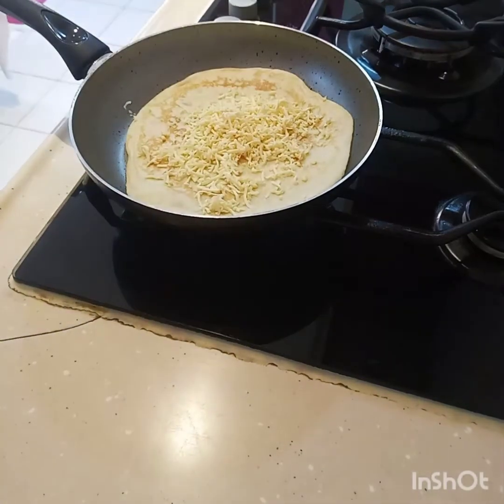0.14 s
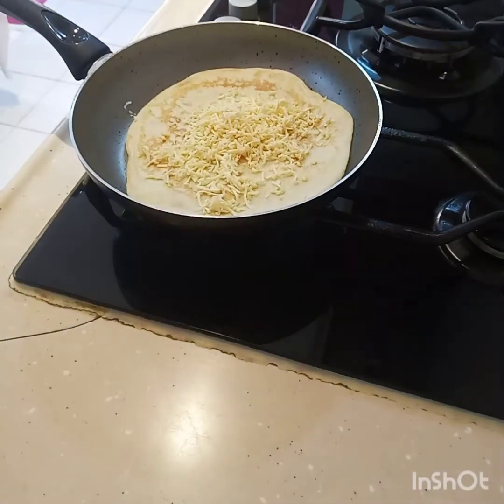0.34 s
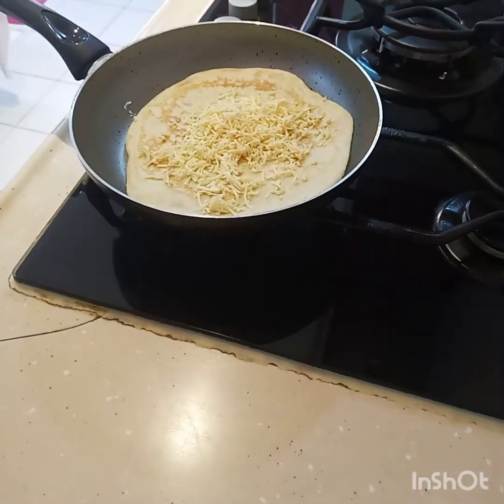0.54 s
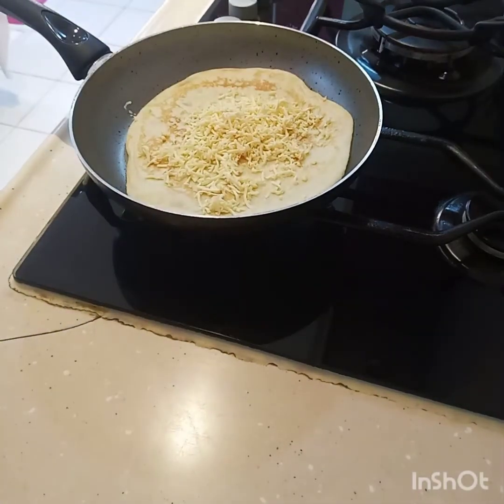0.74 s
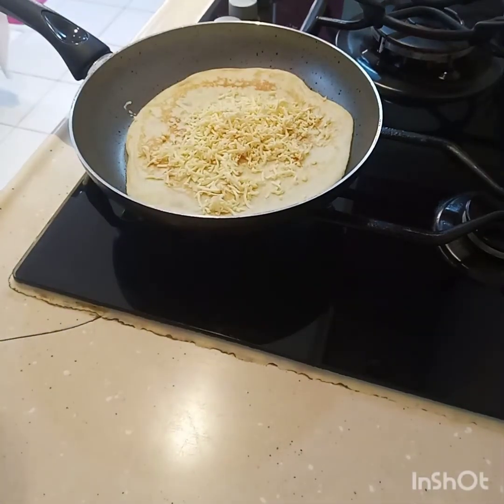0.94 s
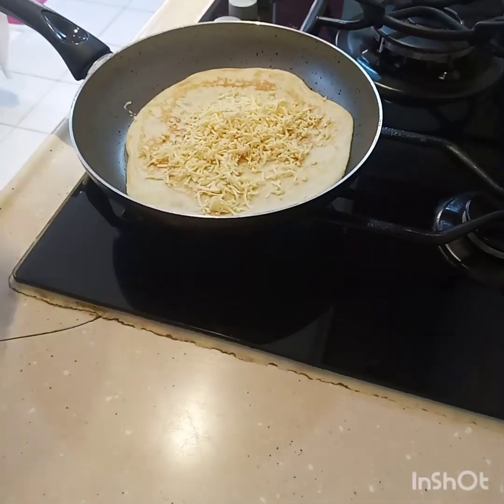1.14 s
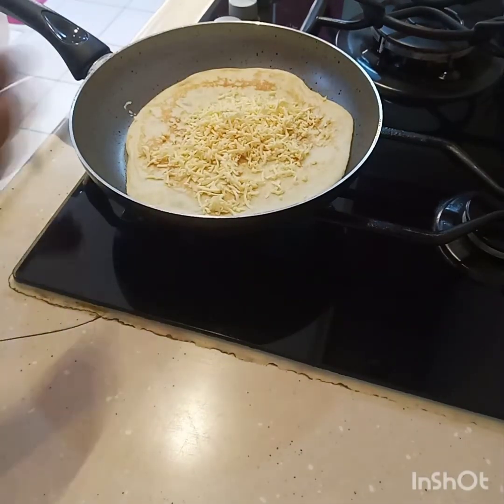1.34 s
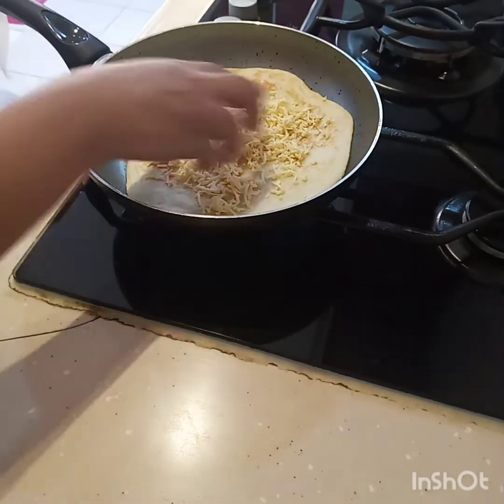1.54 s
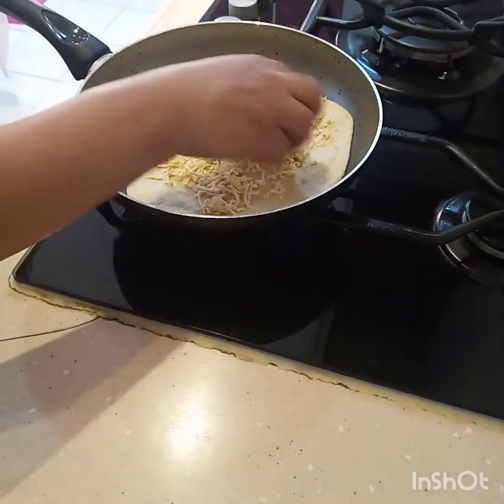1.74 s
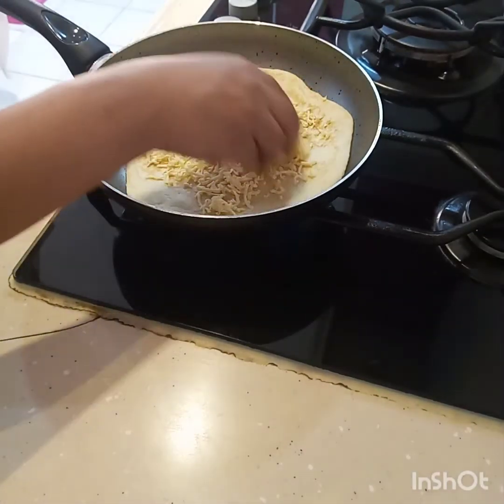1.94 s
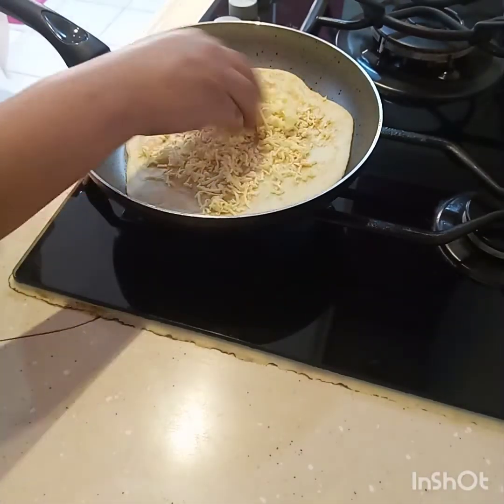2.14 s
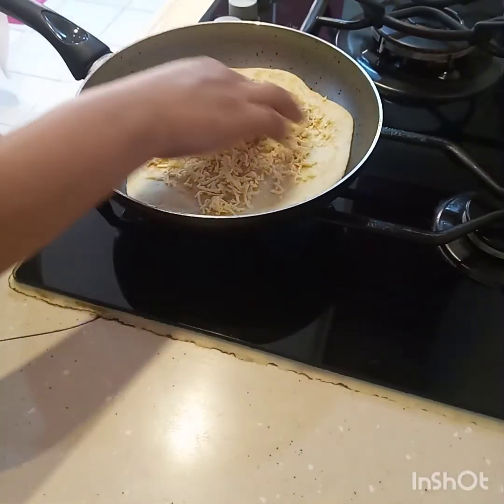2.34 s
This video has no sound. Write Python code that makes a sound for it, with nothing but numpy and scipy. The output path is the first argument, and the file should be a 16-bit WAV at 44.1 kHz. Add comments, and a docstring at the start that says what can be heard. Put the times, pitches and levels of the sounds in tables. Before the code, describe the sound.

A dish is set down close by, knocking at about 0.2 and 0.35 seconds, with a short scrape between and a brief ring in the tiled kitchen. Much quieter, small sharp ticks come from a frying pan throughout. An arm rustles softly around 1.2 seconds. From 1.6 to 2.2 seconds grated cheese patters lightly onto bread, with a few soft plops, over a faint rumble, hiss and hum.

```python
"""A tiled kitchen, at the stove, over a low rumble, hiss and faint hums. A dish is set down: two impacts
excite its modes, and friction keeps them ringing in the short slide between. An arm rustles in over
the pan and scatters grated cheese on bread: many tiny impacts make a patter, clumps land with damped
notes, and sharp ticks come from the pan. Hob and tiles reflect the sound to two microphone ports,
the left one louder in the middle range."""
import sys
import numpy as np
from scipy import signal
from scipy.fft import rfft, irfft, next_fast_len
from scipy.io import wavfile
from scipy.ndimage import uniform_filter1d, map_coordinates

SR = 44100
rng = np.random.default_rng(int(sys.argv[2]) if len(sys.argv) > 2 else 0)


def file_out(sig):
    """Save sig as 16-bit WAV at sys.argv[1]."""
    # one column per channel
    cols = np.atleast_2d(sig).T
    # limit, then scale
    lim = np.clip(cols, -1, 1)
    pcm = np.round(lim * 32767).astype(np.int16)
    wavfile.write(sys.argv[1], SR, pcm)


N = 105840
OCTAVES_HZ = 62.5 * 2. ** np.arange(9)


def undb(db):
    """Amplitude ratio of a level in decibels."""
    return 10 ** (np.asarray(db) / 20)


def unit(x):
    """Normalisation to a mean energy of 1 per channel."""
    return x / np.sqrt(np.mean(np.sum(x ** 2, axis=-1)))


def fade(t, t60):
    """Exponential decay, by 60 dB in t60 seconds."""
    return np.exp(-np.log(1000) * t / t60)


def curve(points):
    """Amplitude envelope interpolated through (t/s, level/dB) points."""
    return undb(np.interp(np.arange(N) / SR, *np.array(points).T))


def walk(rate):
    """Slow random modulation: noise held for 1/rate seconds and smoothed twice."""
    hold = int(SR / rate)
    steps = np.repeat(rng.standard_normal(512), hold)[:N + hold]
    return uniform_filter1d(uniform_filter1d(steps, hold), hold)[:N]


def over_hz(points, f):
    """Interpolation of (f/Hz, value) points on a logarithmic frequency axis."""
    hz, value = np.array(points).T
    return np.interp(np.log(f + 1), np.log(hz), value)


def octave(x, hz):
    """One band of an overlapping octave filter bank."""
    weights = list(zip(OCTAVES_HZ, OCTAVES_HZ == hz))
    return irfft(rfft(x) * over_hz(weights, np.fft.rfftfreq(x.shape[-1], 1 / SR)))


def colour(x, points):
    """Minimum-phase filter through (f/Hz, gain/dB) points, made by folding the cepstrum."""
    n = 2 * next_fast_len(x.shape[-1])
    cepstrum = irfft(np.log(undb(over_hz(points, np.fft.rfftfreq(n, 1 / SR)))))
    cepstrum[1:n // 2] *= 2
    cepstrum[n // 2 + 1:] = 0
    return irfft(rfft(x, n) * np.exp(rfft(cepstrum)))[..., :x.shape[-1]]


def add(out, x, at):
    """Superposition of x on out, starting at a time in seconds."""
    i = max(int(at * SR), 0)
    out[:, i:i + x.shape[-1]] += x[:, :N - i]


def convolve(x, response):
    """Output of a linear system: its input convolved with its impulse response."""
    return signal.fftconvolve(np.atleast_2d(x), np.atleast_2d(response), axes=-1)[:, :N]


def ring(t, modes, polarity=1):
    """Free vibration as a sum of damped modes; a polarity of -1 alternates their signs."""
    return sum(polarity ** k * undb(db) * unit(np.sin(2 * np.pi * hz * t) * fade(t, t60))
               for k, (hz, db, t60) in enumerate(modes))


def diffuse(size, coherent_below_hz=265):
    """Diffuse-field noise: only long wavelengths are coherent at the two ports."""
    coherence = 1 / (1 + (np.fft.rfftfreq(size, 1 / SR) / coherent_below_hz) ** 4)
    mid, side = rfft(rng.standard_normal((2, size)))
    mid, side = mid * np.sqrt(1 + coherence), side * np.sqrt(1 - coherence)
    return irfft(np.array([mid + side, mid - side]), size)


def contacts(per_s, spread_db):
    """A Poisson process of tiny impacts of uneven strength."""
    hits = (rng.random((2, N)) < per_s / SR) * rng.choice([-1, 1], (2, N))
    return unit(hits * undb(spread_db * np.minimum(rng.exponential(size=(2, N)), 4)))


def grains(hits, envelope, spectrum, room, room_db=-2.5):
    """Shot noise: dense impacts and their reverberation, shaped in frequency and time."""
    sound = hits + undb(room_db) * unit(convolve(hits[0], room))
    return unit(colour(sound, spectrum)) * np.sqrt(N) * curve(envelope)


def kitchen(build_s=0.01):
    """Room impulse response: a diffuse field builds up, and each octave decays at its own rate."""
    # reverberation time (f/Hz, t60/s)
    decay = [(100, 0.47), (300, 0.52), (800, 0.37), (1800, 0.5), (4000, 0.16), (12000, 0.61)]
    t, noise = np.arange(SR) / SR, diffuse(SR)
    tail = sum(octave(noise, hz) * fade(t, over_hz(decay, hz)) for hz in OCTAVES_HZ)
    return unit(tail * (1 - np.exp(-t / build_s)))


def background(waver_db=2):
    """Random modulation: octaves of rumble and hiss waver singly and together, over narrow-band hums."""
    # spectrum of the noise (f/Hz, gain/dB)
    spectrum = [(25, 2), (50, -13), (72, 5.5), (120, -4), (170, -1.5), (270, 1.5), (370, -11.5),
                (620, -12.5), (820, -0.5), (940, -4), (1130, -1), (1400, -17), (1750, -10.5), (2080, -7.5),
                (2600, -24.5), (4200, -14.5), (5500, -26), (7600, -10.5), (9300, -22.5), (11500, -18.5),
                (13600, -33.5), (15400, -19)]
    # envelope of the noise (t/s, level/dB)
    envelope = [(0, -44.5), (.15, -51), (.45, -51.5), (.7, -51.5), (1.05, -50.5), (1.38, -54), (1.55, -55),
                (2.1, -54), (2.4, -57)]
    # low hums (f/Hz, level/dB)
    hums = [(75, -77), (119, -66), (178, -66.5), (221, -75.5), (258, -78)]
    t = np.arange(N) / SR
    noise = unit(colour(diffuse(N), spectrum)) * np.sqrt(N)
    out = np.zeros((2, N))
    for hz in OCTAVES_HZ:
        depth_db = 1.5 if hz <= 2000 else -1
        out += octave(noise, hz) * undb(depth_db * walk(13.7))
    out *= curve(envelope) * undb(waver_db * walk(10))
    for hz, db in hums:
        phasor = walk(6.93) + 1j * walk(6.93)  # amplitude and phase both wander
        out += undb(db) * np.real(phasor * np.exp(2j * np.pi * hz * t))
    return out


def arm_rustle(room):
    """Friction noise: a moving arm makes thousands of tiny, nearly equal contacts a second."""
    # envelope of the rustle (t/s, level/dB)
    envelope = [(0, -51), (.04, -54.5), (.07, -62), (.76, -68.5), (.87, -55), (.94, -60), (1.02, -51.5),
                (1.17, -53.5), (1.229, -39), (1.275, -41), (1.335, -47.5), (1.40, -59.5), (2.4, -75)]
    # spectrum of the rustle (f/Hz, gain/dB)
    spectrum = [(100, 3.5), (500, -16.5), (900, -1), (1450, 0.5), (2500, 3), (4500, 1.5), (7000, 1.5),
                (9000, -6.5), (13000, -21), (15500, -32)]
    return grains(contacts(per_s=3400, spread_db=0.5), envelope, spectrum, room)


def ticks(room, snap_s=0.00029, snap_spread_db=1, echo_s=0.0075, echo_db=-9, room_db=-8.5):
    """Broadband transients: each tick is a run of tiny snaps, reflected once by the pan wall."""
    # ticks in the pan (t/s, level/dB, treble lift/dB, t60/s)
    events = [(0.089, -27, 7.5, 0.044), (0.096, -23.5, 1, 0.037), (.631, -23.5, -1.5, 0.041),
              (.802, -22.5, -2, 0.042), (0.84, -17.5, -8, 0.046), (1.0447, -11, -0.5, 0.0063),
              (1.0466, -10.5, -14.5, 0.011), (1.148, -18, -3, 0.1), (1.436, -21.5, -3, 0.048),
              (1.557, -34.5, 11.5, 0.012), (1.8, -23.5, -1, 0.056), (1.8633, -19.5, 2, 0.029),
              (1.961, -36, 15, .03), (2.051, -14.5, -6, 0.014), (2.059, -16.5, 8.5, 0.025),
              (2.0625, -18.5, -11, 0.021), (2.185, -46, 15, 0.033), (2.345, -40.5, 17.5, 0.046)]
    # spectrum of a tick (f/Hz, gain/dB)
    spectrum = [(200, -40), (1000, -25), (2000, -8), (3300, 0), (5000, -4), (7000, 6), (9000, -1.5),
                (13000, -8.5), (15300, -2), (16500, -19)]
    t, out = np.arange(SR // 10) / SR, np.zeros((2, N))
    for at, db, lift_db, t60 in events:
        envelope = fade(t, t60) * (1 - np.exp(-t / (0.11 * t60)))  # longer ticks rise more slowly
        snaps = undb(snap_spread_db * rng.standard_normal(len(t)))[(t / snap_s).astype(int)]
        crack = colour(rng.standard_normal((2, len(t))) * envelope * snaps, spectrum)
        crack = undb(db) * colour(unit(crack), [(4500, 0), (9000, lift_db)])
        add(out, crack, at)
        add(out, undb(echo_db) * crack, at + echo_s)
    return out + undb(room_db) * convolve(out, room)


def dish(room, contact_s=0.0024, bass_late_s=0.023):
    """Impact excitation: two knocks ring the dish's modes and the room, with a slide between them."""
    # knocks (t/s, level/dB, rattle t60/s, rattle/dB, room/dB, treble/dB, bass/dB, chatter/dB)
    knocks = [(0.2139, 8.5, 0.061, -2, 0.5, 1, 0.5, 1), (0.3544, 7, 0.12, 0, -2, -8, 0.5, -6)]
    # modes of the dish (f/Hz, level/dB, t60/s)
    modes = [(468.6, -13, 0.5), (649.7, -11.5, 0.23), (882.6, -11, 0.11), (1101, -16, 0.28),
             (1272, -10.5, 0.16), (1322, -11.5, 0.13), (1625, -5, 0.11), (1737, -10, 0.36),
             (2027, -10.5, 0.05), (2260, -14, 0.032), (2560, -16.5, .018), (5300, -28.5, 0.089),
             (7750, -23, 0.1)]
    # spectrum of the rattle (f/Hz, gain/dB)
    rattle_spectrum = [(40, -42.5), (130, -13.5), (330, -18), (650, -10.5), (1100, -9), (1650, -5.5),
                       (2200, -11), (2900, -29), (4200, -53.5), (8000, -38.5), (15000, -78)]
    # spectrum of the room's response to a knock (f/Hz, gain/dB)
    boom_spectrum = [(30, -41), (55, -19), (85, -1.5), (130, 2.5), (180, -7.5), (260, 4), (370, -5.5),
                     (650, 1.5), (1100, 2.5), (1700, 2), (2300, -4), (3000, -10.5), (4500, -26),
                     (8000, -57), (15000, -71)]
    t, out = np.arange(SR) / SR, np.zeros((2, N))
    boom = colour(room, boom_spectrum)
    bass = signal.sosfiltfilt(signal.butter(2, 200, fs=SR, output="sos"), boom)
    boom = unit(boom - bass * np.exp(-t / bass_late_s))  # the bass builds up late
    ringing = ring(t, modes, polarity=-1)
    struck = ringing * (1 - np.exp(-t / contact_s))
    for at, db, t60, rattle_db, room_db, treble_db, bass_db, chatter_db in knocks:
        rattle = unit(colour(diffuse(SR) * fade(t, t60), rattle_spectrum))
        blow = struck + undb(chatter_db) * chatter() + undb(rattle_db) * rattle + undb(room_db) * boom
        shelves = [(150, bass_db), (400, 0), (1240, 0), (2480, treble_db)]
        add(out, undb(db) * colour(blow, shelves), at)
    return out + slide(ringing, room)


def chatter(count=7, gap_s=0.0028, settle_s=0.012, clack_hz=1496):
    """Repeated impact: the settling rim clacks at slightly uneven intervals, ever weaker."""
    t, out = np.arange(SR) / SR, np.zeros((2, SR))
    clack = np.sin(2 * np.pi * clack_hz * t) * t * fade(t, t60=0.0027)
    gaps = gap_s * rng.uniform(.85, 1.15, count)
    for at in np.cumsum(gaps) - gaps[0]:
        out += np.exp(-(at / settle_s) ** 2) * np.roll(clack, int(at * SR))
    return unit(out)


def slide(dish_response, room, ring_db=-1):
    """Forced vibration: sliding friction makes a scrape and drives the modes of the dish."""
    # envelope of the friction (t/s, level/dB)
    envelope = [(.19, -120), (.228, -62), (.25, -37), (.295, -29), (.335, -38.5), (.36, -34.5), (.41, -120)]
    # spectrum of the scrape (f/Hz, gain/dB)
    spectrum = [(50, -8), (90, -8.5), (160, -15), (300, -11.5), (700, -8), (1300, -18), (1750, 2.5),
                (2300, -14), (4000, -26), (8000, -35), (15000, -46)]
    scrape = grains(contacts(per_s=3400, spread_db=3), envelope, spectrum, room)
    friction = rng.standard_normal((2, N)) * curve(envelope)
    return scrape + undb(ring_db) * convolve(friction, dish_response)


def swells():
    """Amplitude modulation: faint low tones come and go under raised-cosine envelopes."""
    # passing hums (centre t/s, duration/s, f/Hz, level/dB)
    tones = [(0.867, 0.16, 220, -49), (1.048, 0.21, 310, -56), (1.641, 0.053, 268, -46),
             (1.877, 0.099, 249, -52), (2.106, 0.38, 129.6, -57), (2.284, 0.12, 240, -53)]
    t, out = np.arange(N) / SR, np.zeros((2, N))
    for at, length, hz, db in tones:
        envelope = np.cos(np.pi * np.clip((t - at) / length, -.5, .5)) ** 2
        out += undb(db) * envelope * np.sin(2 * np.pi * hz * t)
    return out


def plops(room, room_db=-2.5):
    """Damped oscillation: each clump lands on the bread with a short note of soft onset."""
    # landings (t/s, level/dB, f/Hz)
    landings = [(.842, -23.5, 1990), (1.965, -15, 810), (2.012, -27.5, 2110), (2.043, -26.5, 910),
                (2.172, -25, 2025)]
    t, out = np.arange(SR // 10) / SR, np.zeros((2, N))
    for at, db, hz in landings:
        note = unit(np.sin(2 * np.pi * hz * t) * t * fade(t, t60=0.021))
        add(out, undb(db) * np.array([note, note]), at)
    return out + undb(room_db) * convolve(out, room)


def patter(room, clump_db=2.5, clumps_per_s=110):
    """Random impacts: shreds of cheese hit the bread in uneven clumps and faintly excite the pan."""
    # envelope of the falling cheese (t/s, level/dB)
    envelope = [(1.45, -100), (1.57, -66), (1.61, -48.5), (1.655, -47.5), (1.72, -51.5), (1.77, -60.5),
                (1.95, -59), (1.99, -45), (2.03, -52), (2.07, -48.5), (2.13, -57), (2.19, -53.5),
                (2.25, -98), (2.4, -85)]
    # spectrum of the patter (f/Hz, gain/dB)
    spectrum = [(40, -45), (80, 10.5), (150, 9), (280, -0.5), (430, -18.5), (620, -1), (800, -5.5),
                (1250, 2), (1700, -2.5), (2050, 2), (2700, -7), (3300, -4.5), (4200, -0.5), (5400, -8.5),
                (7200, -1.5), (9500, -15.5), (15000, -28)]
    # modes of the pan (f/Hz, level/dB, t60/s)
    modes = [(809, -13, 0.093), (1180, -18, 0.063), (1300, -19, 0.04), (2054, -15.5, 0.026)]
    pan = ring(np.arange(SR // 4) / SR, modes)
    shreds = unit(contacts(per_s=2200, spread_db=3) * undb(clump_db * walk(clumps_per_s)))
    force = shreds * np.sqrt(N) * curve(envelope)
    return grains(shreds, envelope, spectrum, room) + convolve(force, pan)


def near_stove(x, echo_db=-6.5):
    """Early reflections from hob and tiles interfere with the direct sound and colour it."""
    t = np.arange(SR // 20) / SR
    reflections = unit(rng.standard_normal((2, len(t))) * fade(t, t60=0.057))
    reflections = colour(reflections, [(250, -1.5), (600, 4.5), (2500, 2.0), (4500, 3.0)])
    return (x + undb(echo_db) * convolve(x, reflections)) / np.hypot(1, undb(echo_db))


def scene():
    """Superposition of all sources in one reverberant kitchen."""
    room = kitchen()
    arm = arm_rustle(room)
    set_down = dish(room)
    small_sounds = ticks(room) + plops(room) + arm + patter(room) + background()
    return set_down + near_stove(small_sounds) + swells()


def record(dry, lag_s=0.00115, low_cut_hz=51, top_hz=16100):
    """Level and time differences: two band-limited ports are coloured unequally, and the left lags."""
    # left port minus right port (f/Hz, level/dB)
    balance = [(60, 3.5), (200, 5), (380, 5.5), (750, 11.5), (1300, 13.5), (2000, 17), (3000, 13.5),
               (5500, 12), (8000, 23.5), (11000, -7), (13000, -4.5), (15000, 0)]
    left = colour(dry[0], [(hz, -10 * np.log10((1 + undb(-2 * db)) / 2)) for hz, db in balance])
    right = colour(dry[1], [(hz, -10 * np.log10((1 + undb(2 * db)) / 2)) for hz, db in balance])
    left = map_coordinates(left, [np.arange(N) - int(lag_s * SR)], order=0, mode="mirror")
    high_pass = signal.butter(3, low_cut_hz, "high", fs=SR, output="sos")
    low_pass = signal.ellip(10, .2, 70, top_hz, fs=SR, output="sos")
    return signal.sosfilt(np.vstack([high_pass, low_pass]), np.array([left, right]))


dry = scene()
out = record(dry)
file_out(out)
```